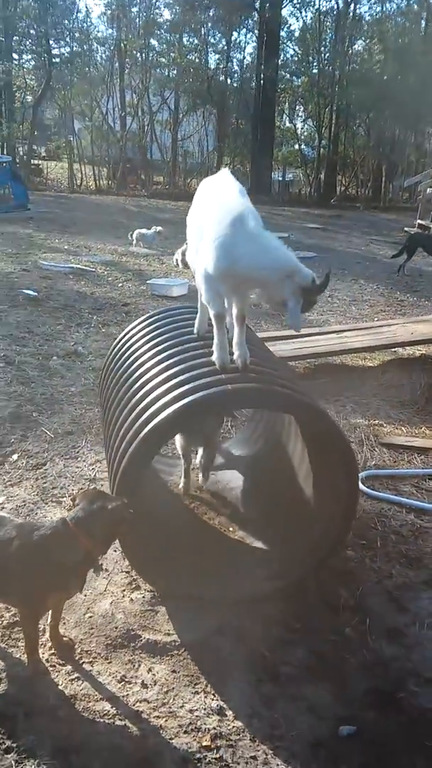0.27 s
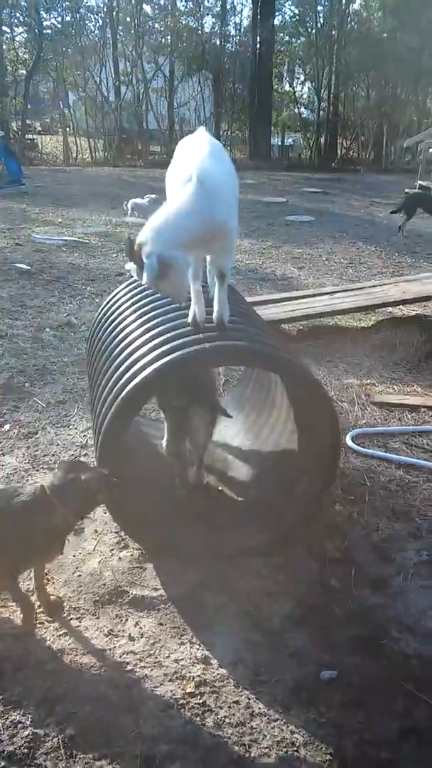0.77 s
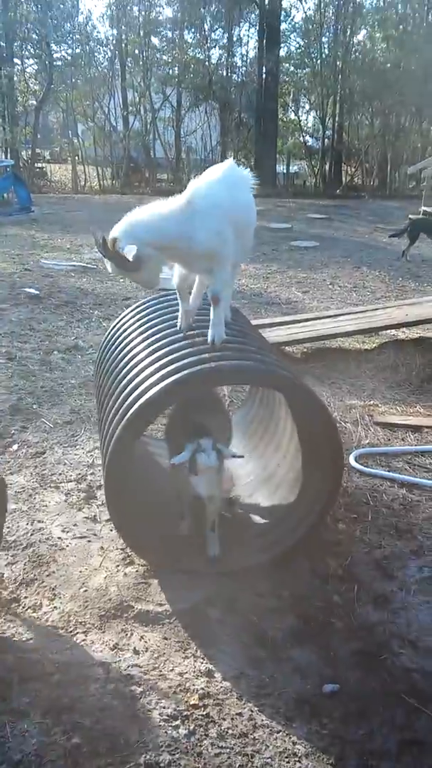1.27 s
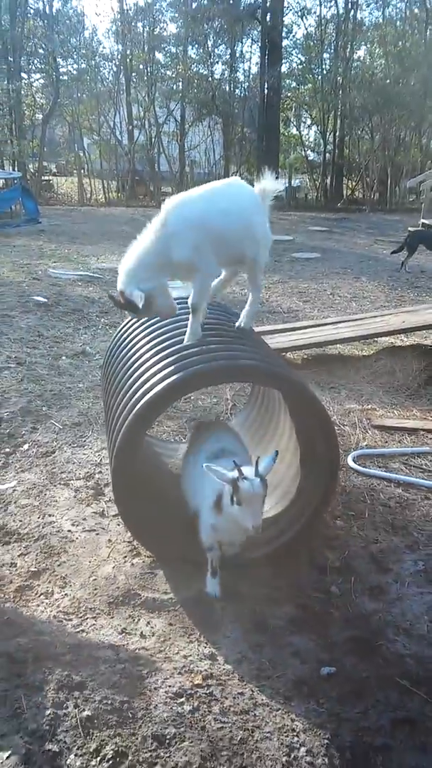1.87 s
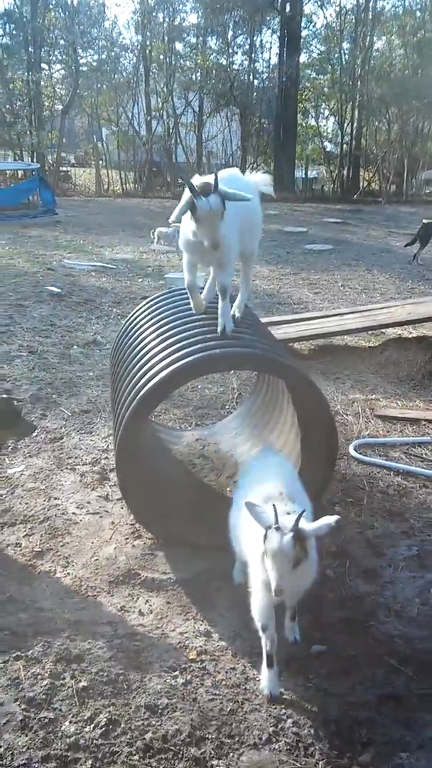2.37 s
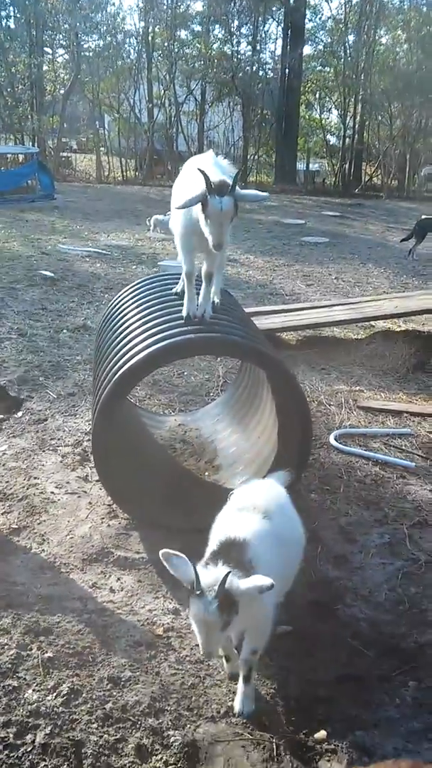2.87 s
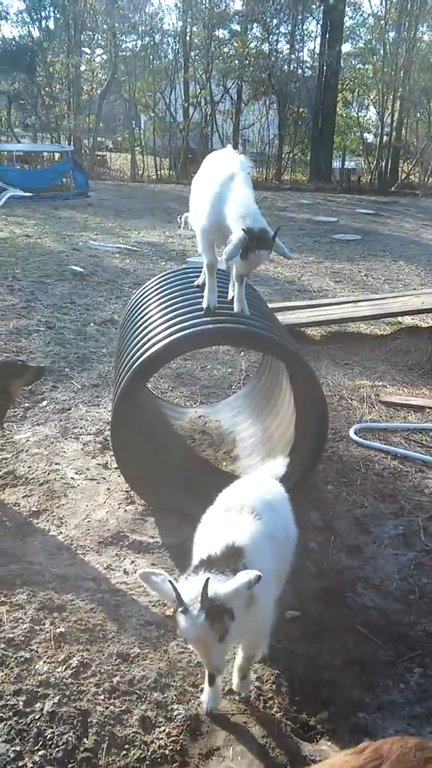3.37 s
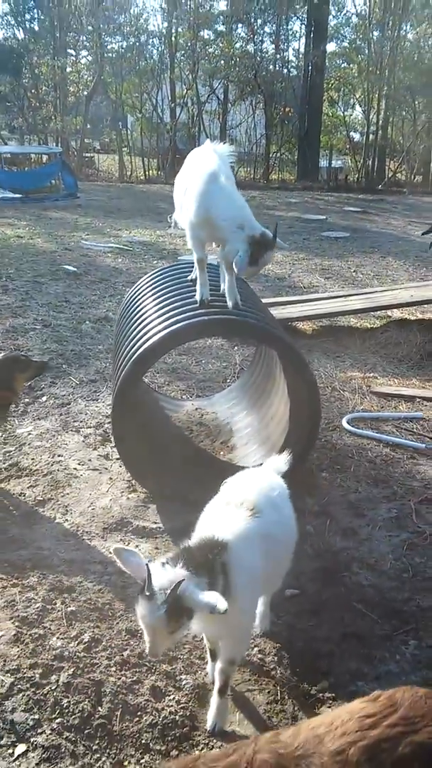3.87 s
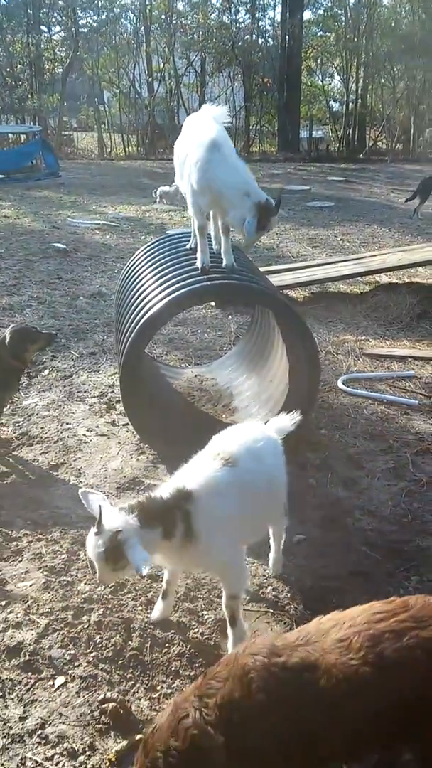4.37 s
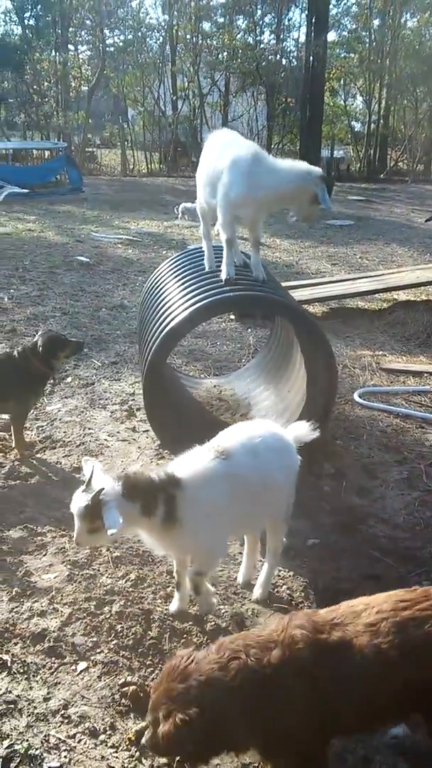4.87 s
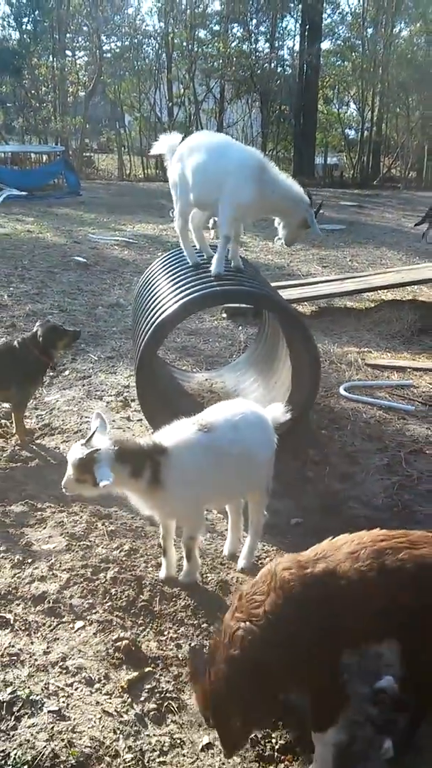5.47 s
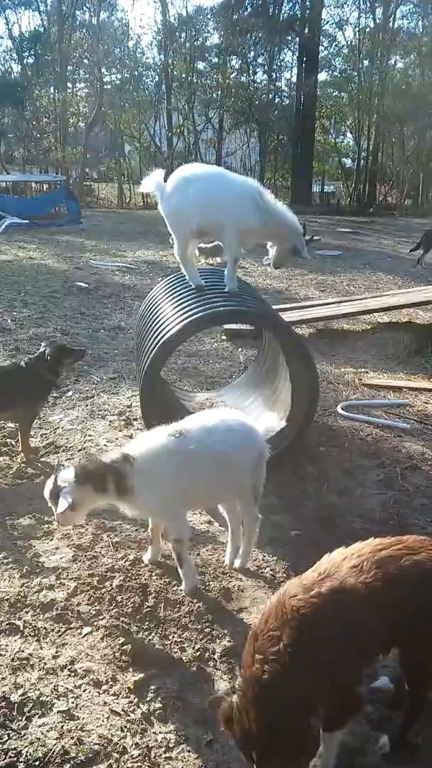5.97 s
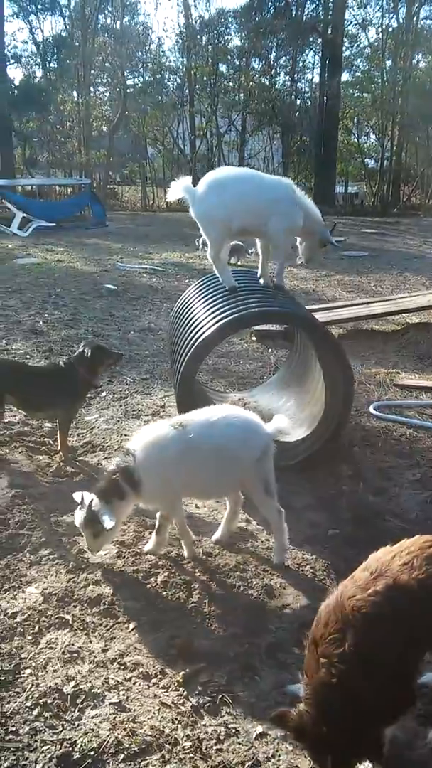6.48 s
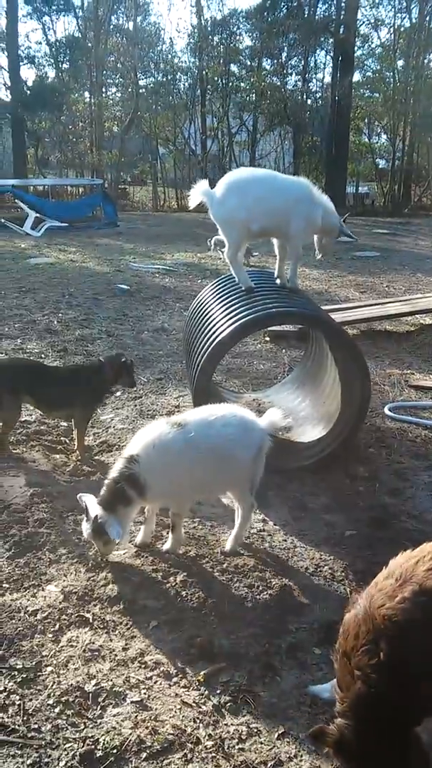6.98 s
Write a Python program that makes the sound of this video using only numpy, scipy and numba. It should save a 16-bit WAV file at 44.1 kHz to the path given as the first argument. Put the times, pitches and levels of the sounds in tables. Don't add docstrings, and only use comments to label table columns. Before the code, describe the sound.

Dry litter crackles in a quiet yard, one short hoarse yelp bursts out close by, then hooves knock through a plastic pipe and dwindle to sparse taps.

```python
import sys
import numpy as np
from scipy import signal
from scipy.fft import rfft, irfft
from scipy.io import wavfile
from scipy.ndimage import uniform_filter1d, minimum_filter1d, map_coordinates
from numba import njit

SR = 44100
rng = np.random.default_rng(int(sys.argv[2]) if len(sys.argv) > 2 else 0)


def rack_gain(trim_db):
    fader = np.asarray(trim_db, float)
    return 10 ** (fader / 20)


def to_wav(s):
    ch = np.atleast_2d(s).T
    pcm = np.round(np.clip(ch, -1, 1) * 32767)
    wavfile.write(sys.argv[1], SR, pcm.astype(np.int16))


N = 318622
TOP_HZ, CLICK_TOP_HZ = 15850, 16900


def unit(x):
    return x / np.sqrt(np.mean(x ** 2))


def shape_db(points, hz):
    f, db = np.transpose(points)
    return np.interp(np.log(np.maximum(hz, 1)), np.log(f), db)


def noise(points, lo_hz, hi_hz, count):
    hz = np.arange(count // 2 + 1) * SR / count + 1e-9
    edges = 1 / np.sqrt((1 + (lo_hz / hz) ** 8) * (1 + (hz / hi_hz) ** 8))
    return irfft(rfft(rng.standard_normal(count)) * rack_gain(shape_db(points, hz)) * edges, count)


def walk(rate, count):
    k = int(SR / rate)
    steps = np.repeat(rng.standard_normal(count // k + 1), k)
    return 1.5 * uniform_filter1d(uniform_filter1d(steps, k), k)[:count]


def add(out, s, x):
    i = int(s * SR)
    out[i:i + len(x)] += x[:len(out) - i]


def ring(hz, db, t60, push_s):
    t = np.arange(int(.5 * SR))[:, None] / SR
    modes = rack_gain(db) * np.sin(2 * np.pi * hz * t) * rack_gain(-60 * t / t60)
    return modes.sum(axis=1) * (1 - np.exp(-t[:, 0] / push_s))


def low_pass(x, hz):
    return signal.sosfilt(signal.ellip(10, .2, 60, hz, fs=SR, output="sos"), x)


def gate_db(stirs):
    open_db_per_s, shut_db_per_s, shut_db = 330, 129.5, -84.5
    linger_db, linger_db_per_s = -12.5, 39.5
    t, power = np.arange(N) / SR, rack_gain(2 * shut_db)
    for s, db, hold in stirs:
        early = np.maximum(s - t, 0)
        after = np.maximum(t - s - hold, 0)
        closing_db = np.maximum(-shut_db_per_s * after, linger_db - linger_db_per_s * after)
        power = power + rack_gain(2 * (db - open_db_per_s * early + closing_db))
    return 10 * np.log10(power)


# time in seconds, level in dB.
MACHINE_LEVEL = [(0.0, -58), (0.08, -49.5), (0.54, -68.5), (0.64, -52.5), (0.98, -64), (1.07, -77),
                 (1.18, -63.5), (2.05, -55.5), (2.51, -84), (3.54, -56), (3.7, -72), (4.0, -53),
                 (4.08, -68.5), (5.41, -54.5), (5.75, -45), (6.58, -51), (6.92, -72), (7.22, -80)]


def machine_hum(hum_db, quick_db):
    hz = 97.5 + 1.2 * walk(10, N)
    tone = np.sqrt(2) * np.sin(2 * np.pi * np.cumsum(hz) / SR)
    return tone * rack_gain(hum_db + .45 * quick_db + 1.8 * walk(12, N))


# frequency in Hz, level in dB per Hz.
AIR_COLOUR = [(12, -61), (20, -30), (64, -6.5), (97, -7.5), (125, -4), (246, -11), (335, -20.5), (589, -28),
              (1260, -26), (2550, -41.5), (5010, -45), (9860, -35), (12700, -31.5), (15500, -40.5),
              (16800, -50)]


def open_air(hum_db, slow_db, quick_db):
    hum_swing, gate_swing = hum_db + 60, slow_db + 65.5
    rumble_db = -58.5 + .3 * hum_swing + 0.4 * gate_swing + 0.55 * quick_db
    rumble = unit(noise(AIR_COLOUR, 15, 390, N)) * rack_gain(rumble_db + 2.2 * walk(5.0, N))
    mid_db = -65 + 0.16 * hum_swing + 0.61 * gate_swing + 0.41 * quick_db
    mid = unit(noise(AIR_COLOUR, 420, 4500, N)) * rack_gain(mid_db + 1.502 * walk(20, N))
    return rumble + mid


def leaf_rustle(rustle_db):
    grains = uniform_filter1d(rack_gain(2.2 * rng.exponential(size=N)), size=40)
    leaves = unit(noise(AIR_COLOUR, 4900, 19000, N) * grains)
    return leaves * rack_gain(rustle_db + 1.07 + 1.1 * walk(42, N))


# start in seconds, rustle in dB, hold in seconds.
PAW_STIRS = [(.05, -65.5, 0.094), (0.231, -61, 0.032), (.445, -61.5, 0.014), (0.673, -63, 0.049),
             (0.902, -62.5, 0.055), (1.1, -74, 0.043), (1.22, -59, .14), (1.37, -59.5, .04),
             (1.437, -58, 0.067), (1.623, -58, 0.0066), (1.717, -56.5, 0.097), (1.86, -61.5, 0.068),
             (2.0, -60, 0.27), (2.326, -60, 0.13), (2.664, -62.5, 0.0088), (2.84, -63, 0.016),
             (3.03, -67.5, 0.017), (3.255, -67, 0.073), (3.425, -64, 0.0085), (3.553, -71, .01),
             (3.807, -72.5, 0.0083), (4.033, -72, .01), (4.133, -72.5, 0.03), (4.284, -65.5, 0.0088),
             (4.44, -71.5, 0.081), (4.716, -68.5, 0.1), (4.95, -73.5, 0.065), (5.047, -70.5, 0.084),
             (5.199, -67.5, 0.13), (5.377, -67, 0.39), (5.819, -65.5, 0.51), (6.398, -68, 0.28),
             (6.795, -71, 0.21), (7.05, -71, 0.073)]


def yard():
    hum_db = np.interp(np.arange(N) / SR, *np.transpose(MACHINE_LEVEL))
    knocks = [(s + 0.014, -51 + 0.35 * db, 0.023) for s, db, hz, contact in WALL_THUDS]
    low_db = gate_db(PAW_STIRS + knocks)
    slow_db = uniform_filter1d(low_db, size=SR // 5)
    quick_db = np.clip(low_db - slow_db, -12, 4)
    steady = machine_hum(hum_db, quick_db) + open_air(hum_db, slow_db, quick_db)
    return steady + leaf_rustle(gate_db(PAW_STIRS))


def click(hz):
    t = np.arange(-66, 66) / SR
    return np.sin(2 * np.pi * hz * t + .6) * np.exp(-(t / .00008) ** 2)


# time in seconds, peak in dB.
TWIG_SNAPS = [(.2273, -41), (.239, -38), (.2807, -28.5), (.414, -31.5), (0.4655, -37), (.648, -42),
              (.658, -31.5), (.6666, -32), (0.749, -34.5), (0.8944, -35.5), (0.9367, -45), (0.949, -34),
              (1.561, -35), (1.6455, -35.5), (.607, -42), (2.07, -35.5), (2.104, -42.5), (2.118, -34),
              (2.817, -44), (4.0268, -43), (4.452, -44), (2.2602, -34), (2.636, -35.5), (2.6617, -36.5),
              (2.749, -41), (2.8452, -37), (3.416, -33.5), (4.122, -40.5), (5.361, -39.5), (6.5876, -41.5)]


def snaps():
    sudden, soft, faint = np.zeros(N), np.zeros(N), np.zeros(N)
    for s, db in TWIG_SNAPS:
        add(sudden if db > -31.5 else soft, s, rack_gain(db + 4.5) * click(11820))
    chance = rng.random((900, 2))
    places = (chance[:, 0] * N).astype(int)
    faint[places] = rack_gain(10.5 - 4 * np.log(chance[:, 1] + .02))
    faint *= rack_gain(gate_db(PAW_STIRS))
    soft += np.convolve(faint, click(11500), "same")
    return low_pass(sudden, CLICK_TOP_HZ) + low_pass(soft, TOP_HZ)


# frequency in Hz, level in dB, ring time T60 in seconds.
TAG_MODES = [(6350, -19.5, 0.027), (10060, 0.5, 0.041), (11400, -9, .045), (13750, -18, .07),
             (14640, -13.5, .04)]
# time in seconds, peak in dB.
TAG_CHINKS = [(1.198, -49), (1.42, -52), (1.442, -44.5), (1.48, -53), (1.568, -51.5), (2.286, -45.5),
              (2.3094, -46), (2.32, -48), (2.3356, -31), (2.343, -36), (2.3624, -47), (2.4132, -47.5)]


def collar():
    out, (hz, db, t60) = np.zeros(N), np.transpose(TAG_MODES)
    chances = rng.standard_normal((len(TAG_CHINKS), len(TAG_MODES)))
    for (s, peak_db), chance in zip(TAG_CHINKS, chances):
        mode_hz = hz * (1 + .012 * chance[::-1])
        add(out, s, ring(mode_hz, peak_db - 1.5 + db + 4 * chance, 0.84 * t60, 0.00034))
    return out


# time in seconds, pitch in Hz, second tone in dB, first tone
# against the second in dB, roughness from 0 to 1.
YELP_VOICE = [
    (1.226, 520, -29.5, -4, 0.17),
    (1.238, 590.4, -9.5, -10, 0.43),
    (1.265, 692.3, -7, -12, 0.49),
    (1.276, 722, -17.5, 2, 0.68),
    (1.285, 732, -4, -11, 0.23),
    (1.297, 732, -14.5, -9, 0.25),
    (1.318, 724.2, 0, -41.5, 0.01),
    (1.346, 738, -10.5, -29, .05),
    (1.356, 735, -29.5, -26, .03),
]
# start in seconds, length in seconds, starting pitch in Hz,
# pitch it heads for in Hz, peak in dB.
VOICE_BREAKS = [
    (1.197, 0.042, 600, 1080, -20),
    (1.222, 0.057, 560, 770, -9),
    (1.21, .062, 440, 745, -9),
    (1.327, .043, 914, 620, -6),
]
# rise in seconds, glide in seconds, sag in dB, second tone against
# the first in dB, roughness from 0 to 1.
BREAK_MANNER = [
    (.016, .016, -3, -14, 0.5),
    (0.014, 0.02, -1, -32.5, 0.6),
    (0.018, 0.0089, -5.5, 19.5, .15),
    (0.003, .016, -13, -13, 0.2),
]


def voices():
    release_s, edge_db = 0.018, -29
    s, hz, db, first_db, rough = np.transpose(YELP_VOICE)
    over_db = db - 2.5 - 12 * (1 - 2 * rough)
    out = [np.transpose([s, hz, db + first_db, db, over_db, rough])]
    for row, manner in zip(VOICE_BREAKS, BREAK_MANNER):
        start, length, from_hz, to_hz, db = row
        rise, glide, sag_db, second_db, rough = manner
        t = np.linspace(0, length, num=30)
        hz = to_hz + (from_hz - to_hz) * np.exp(-t / glide)
        turns = [0, rise, max(length - release_s, rise), length]
        level = db + np.interp(t, turns, [edge_db, 0, sag_db, sag_db + edge_db])
        first = level - max(second_db, 0)
        second = level + min(second_db, 0)
        out.append(np.transpose([start + t, hz, first, second, second - 13, rough + 0 * t]))
    return out


# frequency in Hz, level in dB.
RASP_COLOUR = [(2940, -48), (5000, -21.5), (5590, -10), (5990, -31.5), (6350, -9.5), (6630, -8),
               (8380, -15.5), (8880, -3), (9410, -0.5), (11300, -18.5), (12100, -11), (14200, -18.5),
               (16000, -34)]


def patchy_air(count):
    edges = np.geomspace(5000, 17000, 9)
    bands = [noise(RASP_COLOUR, lo, hi, count) * rack_gain(5 * walk(62, count)) for lo, hi in zip(edges, edges[1:])]
    return unit(sum(bands))


# time in seconds, level in dB.
BREATH_EFFORT = [
    (1.2, -66),
    (1.222, -57.5),
    (1.246, -39.5),
    (1.266, -30),
    (1.28, -30),
    (1.29, -38),
    (1.336, -42),
    (1.36, -51),
    (1.39, -65),
]


def rasp():
    out, count = np.zeros(N), 9216
    t = BREATH_EFFORT[0][0] + np.arange(count) / SR
    hz = np.maximum(np.interp(t, *np.transpose(YELP_VOICE)[:2]), 680)
    sag = 1 + 0.05 * (t - 1.27) / 0.12
    phase = 2 * np.pi * np.cumsum(hz * (1 + 0.0084 * walk(200, count))) / SR
    tones = np.zeros(count)
    for k in range(7, 22):
        flicker_db = 5.8 * walk(70, count)
        tones += rack_gain(shape_db(RASP_COLOUR, k * hz * sag) + flicker_db) * np.sin(k * phase)
    air = map_coordinates(patchy_air(2 * count), [np.cumsum(1 / sag)], order=3)
    effort = rack_gain(np.interp(t, *np.transpose(BREATH_EFFORT))) * (t < BREATH_EFFORT[-1][0])
    add(out, t[0], effort * (unit(air) + rack_gain(-1.5) * unit(tones)))
    return out


# frequency in Hz, level in dB.
THROAT_COLOUR = [(1070, -23.5), (1390, 4), (1690, -17), (1980, -22.5), (2200, -12), (2500, -26),
                 (2880, -11), (3320, -31), (4000, -15.5), (4580, -45.5), (5580, -30), (6000, -50.5),
                 (7800, -80), (13200, -120)]


def dog():
    out, count = np.zeros(N), 6144
    for voice in voices():
        s, *columns = np.transpose(voice)
        t = s[0] + np.arange(count) / SR
        edge = np.interp(t, [s[0], s[0] + .004, s[-1] - .004, s[-1]], [0, 1, 1, 0])
        hz, first_db, second_db, over_db, rough = (np.interp(t, s, c) for c in columns)
        phase = 2 * np.pi * np.cumsum(hz * (1 + .015 * rough * walk(150, count))) / SR
        tone = rack_gain(first_db) * np.sin(phase) + rack_gain(second_db) * np.sin(2 * phase)
        for k in range(3, 8):
            shake_db = 6 * rough * walk(200, count)
            clean_loss_db = 20.5 * (k > 4) * np.clip(.45 - rough, 0, 1)
            level_db = over_db + 1.5 + shape_db(THROAT_COLOUR, k * hz) + shake_db - clean_loss_db
            tone += rack_gain(level_db) * np.sin(k * phase)
        hoarse = unit(noise(THROAT_COLOUR, 1500, 8600, count))
        hoarse *= rack_gain(over_db + 0.5) * np.clip(rough + .05, 0, 1)
        tone *= np.sqrt(2) * rack_gain(5 * rough * walk(150, count))
        add(out, s[0], (tone + hoarse) * edge)
    mouth_hz, mouth_width_hz = 4780, 700
    notch = signal.iirnotch(mouth_hz, mouth_hz / mouth_width_hz, fs=SR)
    out = signal.lfilter(*notch, out + rasp())
    return signal.sosfilt(signal.butter(6, 560, "high", fs=SR, output="sos"), out)


def lasting(table, t60, loss):
    return [(s, db, hz, t60 * (1000 / hz) ** loss, sum(clatter), contact)
            for s, db, hz, contact, *clatter in table]


def blows(table, body, others_db, spread_db, lead, count):
    out, t = np.zeros(N), np.arange(2048) / SR
    lo_hz, hi_hz = body[0][0], body[-1][0]
    for s, db, main_hz, t60, clatter_db, contact in table:
        s -= lead * contact
        level_chance, decay_chance = rng.standard_normal((2, count))
        hz = lo_hz * (hi_hz / lo_hz) ** ((np.arange(count) + rng.random(count)) / count)
        mode_db = shape_db(body, hz) + spread_db * level_chance
        crowd = ring(hz, mode_db, t60 * rack_gain(2.0 * decay_chance), contact)
        push = rng.standard_normal(len(t)) * np.exp(-t / contact)
        crowd = signal.fftconvolve(crowd, push / np.sqrt(np.sum(push ** 2)))
        add(out, s, rack_gain(db + others_db + clatter_db) * crowd / np.abs(crowd).max())
        add(out, s, ring(np.array([main_hz]), db + 4.5, t60, contact))
    return out


# time in seconds, peak in dB, strongest mode in Hz,
# contact in seconds.
WALL_THUDS = [(1.698, -28.5, 409, 0.007), (1.72, -27.5, 408, 0.016), (1.734, -28.5, 247.4, 0.0037),
              (1.747, -28.5, 225, 0.0023), (1.773, -41, 292, .013), (1.877, -19.5, 439.4, .009),
              (1.896, -24.5, 310, 0.00524), (1.923, -34.5, 386, 0.0054), (2.001, -21, 306.6, 0.01),
              (2.027, -20, 341, 0.003), (2.048, -31, 234.7, 0.00603), (2.174, -40, 439, 0.0071),
              (2.213, -43, 384, 0.0055), (2.339, -38, 387, 0.0069), (2.389, -39.5, 230, .014),
              (2.963, -45, 317.6, 0.0079), (3.007, -56.5, 227, 0.0067), (3.235, -30, 369.5, 0.0089),
              (3.285, -43, 340, .008), (3.339, -49, 265, 0.0056), (3.383, -49, 216, 0.011),
              (3.952, -39.5, 316, 0.0081), (3.965, -43, 227, 0.0094), (4.241, -41, 300.3, 0.0094),
              (4.26, -49, 217, 0.00806), (4.773, -42.5, 294, .0092), (4.813, -43, 297, 0.009),
              (4.896, -48, 378, 0.0091), (5.136, -43, 306.5, 0.0029), (5.19, -44.5, 373, 0.0074),
              (5.324, -45.5, 379.5, 0.011), (5.763, -49.5, 177, 0.0083), (5.886, -47, 401, 0.005),
              (6.073, -40.5, 304.7, 0.0067), (6.618, -55, 251.4, 0.0083)]
# frequency in Hz, level in dB.
WALL_MODES = [(190, -11.5), (240, -5), (310, 1.5), (420, -4.5), (500, -14.5)]
# frequency in Hz, level in dB.
SCUFF_COLOUR = [(120, -8), (220, -1), (330, .1), (480, -8), (620, -26), (950, -18), (1500, -22),
                (2200, -32)]


def wall_thuds():
    thuds = lasting(WALL_THUDS, 0.12, 0)
    out = blows(thuds, WALL_MODES, others_db=-2.0, spread_db=3.5, lead=0.91, count=9)
    t = np.arange(12288) / SR
    for s, db, hz, contact in WALL_THUDS:
        swell = (1 - np.exp(-t / .012)) * rack_gain(db - 17 - 60 * t / .3)
        add(out, s, swell * unit(noise(SCUFF_COLOUR, 120, 2200, len(t))))
    return out


# time in seconds,
# peak in dB, strongest mode in Hz, contact in seconds, clatter in dB.
TROT_TAPS = [(1.687, -36, 867, 0.0047, -0.5), (1.707, -22.5, 989, 0.0038, -3),
             (1.72, -26, 1000, 0.0045, -3), (1.732, -29, 927, 0.004, -0.5),
             (1.764, -38.5, 1017, 0.0034, 0.5), (1.775, -42.5, 1055, 0.0025, 1.5),
             (1.867, -24, 940, 0.0062, 2), (1.875, -20.5, 1650, 0.0015, -3),
             (1.888, -29.5, 1500, 0.0035, -16), (1.909, -38, 1067, 0.0047, -2),
             (1.93, -42, 975, 0.0034, -1), (1.991, -39, 1010, 0.0077, 2), (2.022, -24, 1030, 0.0036, -6),
             (2.04, -33, 1040, .004, -6), (2.167, -34, 1000, 0.0018, 1.5),
             (2.185, -42.5, 1417, 0.0036, 4.5), (2.206, -33.5, 805, 0.0052, 1.8),
             (2.265, -48, 1045, .0028, 3), (2.312, -46.5, 1450, 0.0057, -.1), (2.338, -21, 995, 0.0012, -5),
             (2.341, -30, 1500, .002, -3), (2.34, -37, 2400, .002, -9), (2.389, -41.5, 1420, 0.0047, -2.5)]
# time in seconds, peak in dB,
# strongest mode in Hz, contact in seconds, clatter in dB.
TOP_SHIFTS = [(2.962, -45.5, 1556, 0.0041, -0.3), (3.227, -44.5, 1135, 0.0036, .1),
              (3.277, -46.5, 1071, 0.0035, .1), (3.796, -46.5, 1154, 0.0027, 0.5),
              (3.938, -56.5, 799, 0.0039, 1), (4.247, -56.5, 1000, 0.0049, 0.2),
              (4.742, -41, 1014, 0.0038, -4.5), (4.764, -50, 963, 0.0045, 1),
              (4.789, -46.5, 1000, 0.0038, .1), (4.816, -41.5, 993, 0.0045, -0.5),
              (4.893, -57, 927, 0.0031, -5), (4.986, -52.5, 1038, 0.0051, -1.7),
              (5.035, -53, 1030, 0.004, -1.3), (5.174, -47, 1518, 0.005, 1.5),
              (5.191, -47.5, 1450, 0.004, .1), (5.392, -41.5, 1049, 0.0037, 1),
              (5.767, -48, 1040, 0.00307, 1), (5.884, -27, 1005, 0.0021, -11),
              (5.906, -44, 1000, 0.0036, -4), (5.93, -44, 997, 0.0037, -1.5),
              (5.951, -48, 1000, 0.0023, -6), (5.966, -49, 1000, 0.0027, -5.5),
              (6.063, -42.5, 1000, 0.0047, -2), (6.065, -50, 1837, 0.0022, 4),
              (6.475, -55, 1541, 0.0042, .1)]
# frequency in Hz, level in dB.
RIB_MODES = [(650, -64), (850, 2), (1050, 3.5), (1250, -15), (1500, 3), (1800, -12.5), (2050, -43.5)]
# frequency in Hz, level in dB.
HORN_COLOUR = [(1400, 6), (1900, -3), (2150, -5), (2400, -6), (2900, -5.5), (3400, -22.5), (4400, -22),
               (5200, -41.5)]


def rib_taps():
    taps = lasting(TROT_TAPS, 0.054, 0.7) + lasting(TOP_SHIFTS, 0.061, 0.7)
    out = blows(taps, RIB_MODES, others_db=-1.5, spread_db=1.5, lead=0.301, count=22)
    t = np.arange(4096) / SR
    swell = (1 - np.exp(-t / 0.00081)) * (np.exp(-t / 0.0093) + 0.26 * np.exp(-t / 0.018))
    usual_db = -42.5
    for table, crack_db, share in ((TROT_TAPS, -12.5, 1), (TOP_SHIFTS, -18.5, 0.48)):
        for s, db, hz, contact, clatter_db in table:
            level_db = usual_db + share * (db + clatter_db - usual_db) + crack_db
            add(out, s, rack_gain(level_db) * unit(noise(HORN_COLOUR, 1300, 5300, len(t))) * swell)
    return out


# time in seconds, peak in dB.
GRIT_CRUNCHES = [
    (1.705, -43),
    (1.727, -35.5),
    (1.866, -40),
    (2.01, -43),
    (2.2125, -37),
    (2.22, -37.5),
    (2.244, -45.5),
]
# frequency in Hz, level in dB.
GRIT_COLOUR = [(5000, -24), (8000, -15), (10500, 10), (13000, -8), (16000, -10)]


def crunches():
    out, t = np.zeros(N), np.arange(1024) / SR
    for s, db in GRIT_CRUNCHES:
        add(out, s, rack_gain(db) * unit(noise(GRIT_COLOUR, 4000, 18000, len(t))) * np.exp(-t / 0.0035))
    return out


@njit
def walls(x, lags, gain, damp):
    line, soft, out = np.zeros((8, 8192)), np.zeros(8), np.zeros(len(x))
    for i in range(len(x)):
        total = 0.
        for k in range(8):
            soft[k] += (1 - damp) * (gain[k] * line[k, (i - lags[k]) & 8191] - soft[k])
            total += soft[k]
        out[i] = soft[0] - soft[3] + soft[4] - soft[7]
        for k in range(8):
            line[k, i & 8191] = x[i] + soft[k] - total / 4
    return out


def butter(x, order, hz, kind):
    return signal.lfilter(*signal.butter(order, hz, kind, fs=SR), x)


# delay in seconds, level in dB.
SHED_SLAPS = [
    (0.022, -16.5),
    (.038, -21),
    (.082, -21.5),
    (.14, -29.5),
    (0.216, -35),
    (0.311, -47),
]


def echoes(yelp, steps):
    t60_s = 0.71
    thin = butter(yelp, 3, 1299, "high") + rack_gain(-3.5) * butter(steps, 3, 750, "high")
    thin = butter(thin, 4, 3030, "low")
    lags = rng.integers(900, 4000, 8)
    out = rack_gain(-21) * walls(thin + 1e-18, lags, rack_gain(-60 * lags / SR / t60_s), 0.44)
    dull = butter(thin, 2, [1150, 1750], "band") + rack_gain(-6.0) * butter(yelp, 2, [2050, 3100], "band")
    for delay_s, db in SHED_SLAPS:
        add(out, delay_s, rack_gain(db) * dull)
    return out


def scene():
    quiet, sudden = yard() + collar() + crunches(), snaps()
    yelp, steps = dog(), wall_thuds() + rib_taps()
    bent = rack_gain(-38) * butter(yelp ** 2, 2, [20, 400], "band")
    return (low_pass(yelp + bent + steps + echoes(yelp, steps) + quiet, TOP_HZ) + sudden)[None]


def band_limit(x):
    return signal.sosfilt(signal.butter(12, 17000, fs=SR, output="sos"), x)


def record(dry):
    gain = np.minimum(1, .97 / np.maximum(np.abs(dry), 1e-9))
    gain = uniform_filter1d(minimum_filter1d(gain, size=257), size=129)
    return band_limit(dry * gain)


dry = scene()
out = record(dry)
to_wav(out)
```